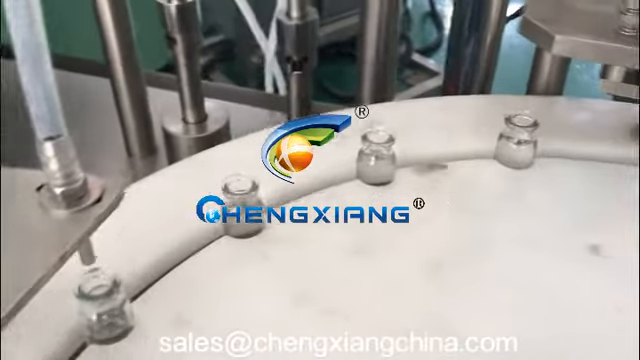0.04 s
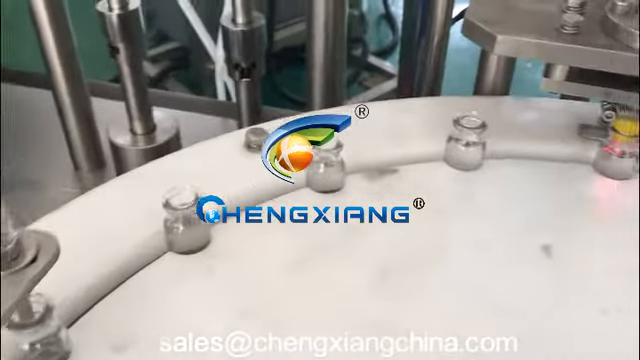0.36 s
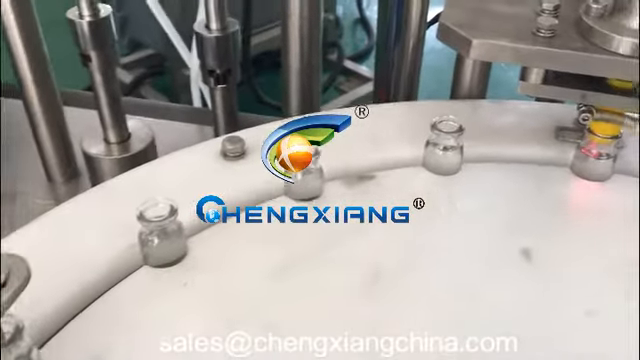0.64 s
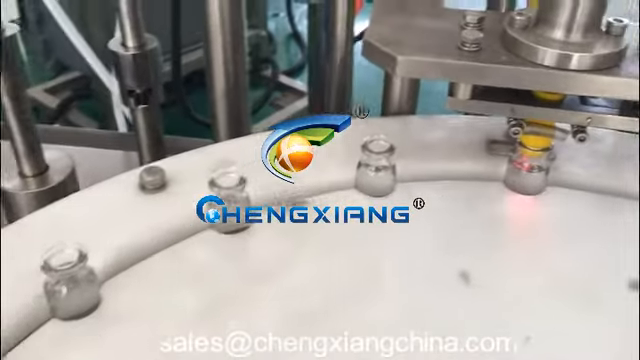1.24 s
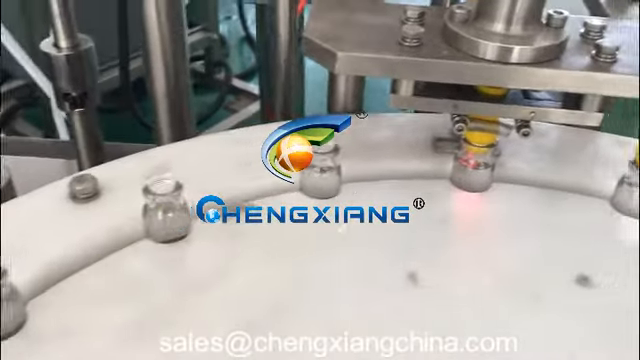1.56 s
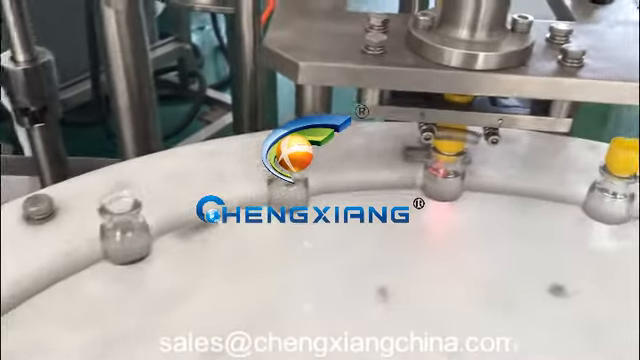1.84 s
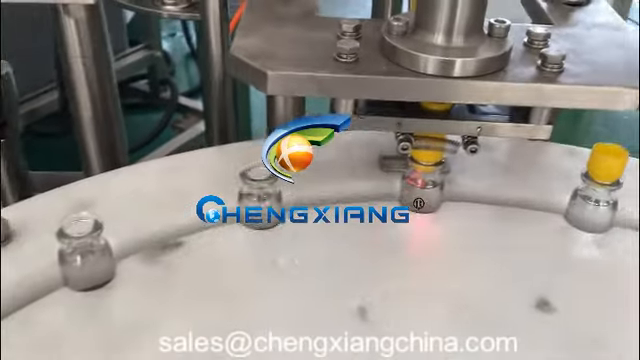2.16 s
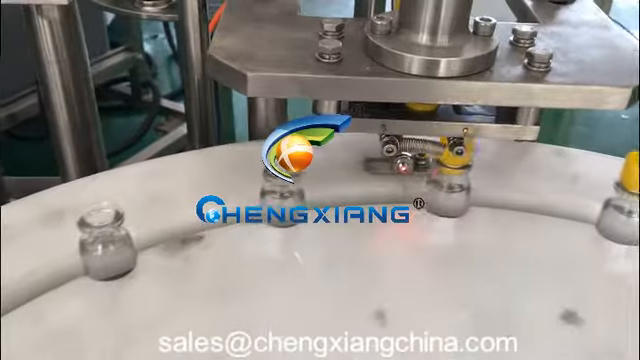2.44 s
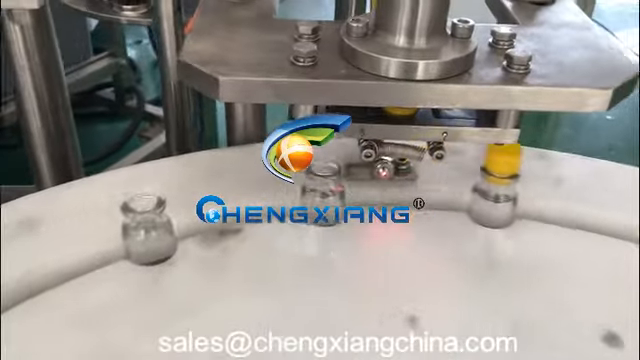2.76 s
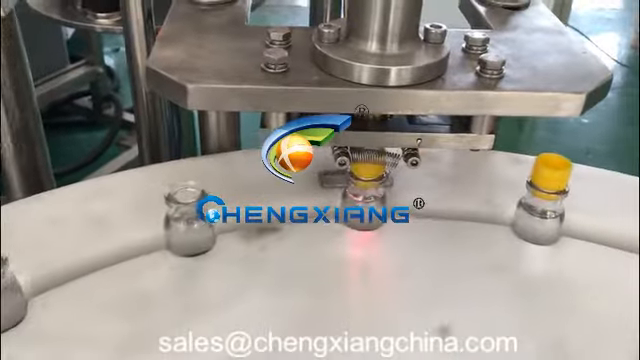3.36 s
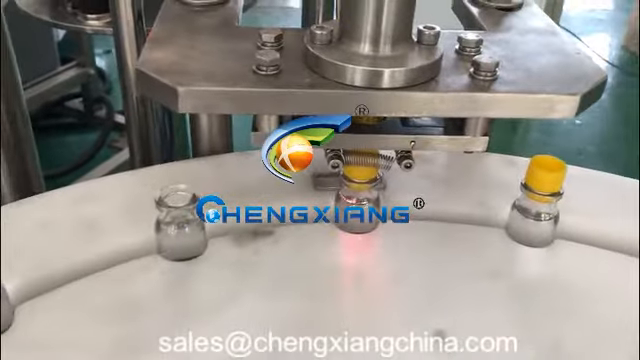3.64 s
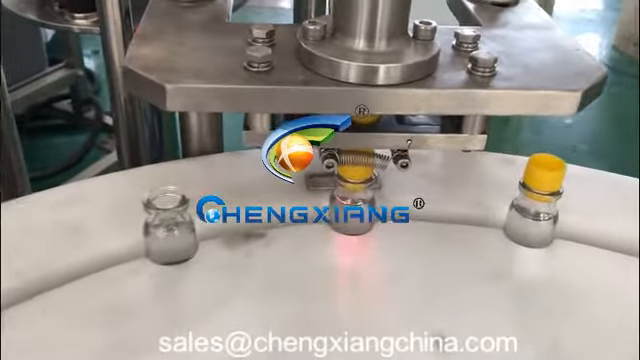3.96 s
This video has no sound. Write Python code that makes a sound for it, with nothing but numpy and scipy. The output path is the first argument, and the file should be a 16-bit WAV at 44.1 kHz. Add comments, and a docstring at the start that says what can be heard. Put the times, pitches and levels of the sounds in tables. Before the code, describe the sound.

A steady air jet hisses close by, broken by two short pauses with metal clunks.

```python
"""An air jet hisses close by on a bottle capping machine in a factory hall, while the filling head rubs.
Almost at once a valve thumps and cuts the air, a latch ticks and a metal slide rattles against its stop.
At 0.6 s the air surges back, and a cylinder lands with a clunk that rings the frame. The jet hisses on
until a second cut at 3.3 s; the slide clacks, then sings thinly. At 3.7 s come another surge and clunk.
The frame hums whenever parts travel, and distant machines rumble throughout."""
import sys
import numpy as np
from scipy import signal
from scipy.fft import rfft, irfft
from scipy.io import wavfile
from scipy.ndimage import uniform_filter1d

SR = 44100
rng = np.random.default_rng(int(sys.argv[2]) if len(sys.argv) > 2 else 0)


def wav_out(sig):
    """Save sig, one row per channel (or a flat mono array), as 16-bit PCM at SR to the path in sys.argv[1]."""
    wavfile.write(sys.argv[1], SR, np.round(np.clip(np.atleast_2d(sig).T, -1, 1) * 32767).astype(np.int16))


N = 176400  # 4 seconds
USUAL_NOZZLE_HZ, NOZZLE_WIDTH_HZ = 4500, 250

# How each of the three blasts of air changes over time.
# Each row: time in seconds, body level in dB, treble level in dB, pitch of the nozzle in Hz.
FIRST_BLAST = [(0.0, -14, -16.5, 4480), (0.084, -16, -16.5, 4470), (0.162, -13.5, -17, 4630),
               (0.192, -20.5, -27, 4260)]
LONG_BLAST = [(0.58, -40, -39, 4190), (0.6, -19, -28, 4130), (0.63, -11.5, -18.5, 4200),
              (0.68, -17.5, -20, 4400), (0.77, -15, -16.5, 4520), (0.89, -16, -17.5, 4470),
              (2.45, -15.5, -17.5, 4400), (2.68, -16, -17, 4340), (2.8, -16, -17.5, 4270),
              (3.25, -16, -18, 4200), (3.27, -17, -22.5, 4210), (3.29, -20, -29.5, 4100)]
LAST_BLAST = [(3.674, -68, -46, 4230), (3.688, -22, -34.5, 4020), (3.72, -14, -19.5, 4200),
              (3.752, -14.5, -22.5, 4100), (3.784, -20, -20, 4270), (3.824, -14.5, -16, 4350),
              (3.886, -15, -16, 4230), (3.995, -16, -18, 4170)]
def air_jet():
    """Three blasts of air leave the nozzle; the last two surge and squeal as they build up."""
    hiss = blast(FIRST_BLAST, fresh=False) + blast(LONG_BLAST) + blast(LAST_BLAST)
    return steel_reflections(nozzle_dip(hiss)) + squeals()


# The tone of the settled jet. Each row: frequency in Hz, level in dB.
JET_TONE = [(240, -102), (400, -30.5), (490, -58), (620, -33), (718, -40), (863, -31.5), (961, -31),
            (1480, -24), (1890, -27.5), (2200, -27.5), (2420, -18), (3090, -19.5), (3780, -4.5), (4250, -4),
            (4690, -2.5), (5140, -16), (5650, -9), (6470, -11.5), (6990, -16.5), (7550, -19.5), (8150, -10),
            (9300, -4.5), (10600, -14.5), (12500, -11.5), (14300, -10.5), (15800, -16.5)]
# The extra strength of a fresh blast. Each row: frequency in Hz, boost in dB.
SURGE_TONE = [(500, 12), (2000, 1), (2700, 8), (3400, 2), (4400, 5), (5300, 4.5), (6500, 5.5), (7600, 4),
              (9000, 3), (15000, 2.5)]
def blast(curve, fresh=True):
    """Swirling air hisses and the nozzle resonates; a fresh blast starts strong, then settles."""
    times, body_db, treble_db, pitches = np.transpose(curve)
    jet_db, usual_body_db, usual_treble_db = -16, -16.5, -17
    treble_from_hz, crossover_hz = 6250, 815
    open_db_per_s, shut_db_per_s, settle_s = 1200, 700, 0.29

    def gain_db(hz, t):
        treble_share = (1 + np.tanh((hz - treble_from_hz) / crossover_hz)) / 2
        body = (1 - treble_share) * np.interp(t, times, body_db - usual_body_db)
        treble = treble_share * np.interp(t, times, treble_db - usual_treble_db)
        opening = open_db_per_s * np.maximum(times[0] - t, 0)
        shutting = shut_db_per_s * np.maximum(t - times[-1], 0)
        age_s = np.maximum(t - times[0], 0)
        surge = fresh * read(SURGE_TONE, hz) * np.exp(-(age_s / settle_s) ** 2)
        # The body flutters very slightly, and random patches of the hiss swell and fade by about 1 dB.
        flutter = 0.07 * (1 - treble_share) * unit(uniform_filter1d(rng.standard_normal(len(t)), 12))
        patches = smooth_random(hz, t, frames=30, bands=4)
        nozzle_hz = np.interp(t, times, pitches)
        resonance = 5 * bell(hz, nozzle_hz, NOZZLE_WIDTH_HZ)
        # The whole tone slides part of the way with the nozzle's pitch.
        drift = read(JET_TONE, hz * (USUAL_NOZZLE_HZ / nozzle_hz) ** .35) - read(JET_TONE, hz)
        return body + treble - opening - shutting + surge + drift + resonance + flutter + patches
    return amp(jet_db) * shaped(noise(JET_TONE), gain_db)


def nozzle_dip(hiss):
    """Cuts a sharp dip above the nozzle's pitch; a small peak beside it fades when that pitch drops."""
    times, _, _, pitches = np.transpose(FIRST_BLAST + LONG_BLAST + LAST_BLAST)

    def gain_db(hz, t):
        nearness = np.clip(1 + (np.interp(t, times, pitches) - USUAL_NOZZLE_HZ) / NOZZLE_WIDTH_HZ, 0, 1)
        return 5 * nearness * bell(hz, 4865, width_hz=55) - 9 * bell(hz, 5010, width_hz=85)
    return shaped(hiss, gain_db, size=2048)


def steel_reflections(hiss, depth_db=1.8):
    """Echoes off nearby steel add narrow peaks and dips, which wander as if the listener were moving."""
    ripple_db = lambda hz, t: depth_db * smooth_random(hz, t, frames=70, bands=2, mode="wrap")
    return shaped(hiss, ripple_db, size=1024)


# The squeals of the jet. Each row: loudest moment in seconds, level in dB.
SQUEALS = [(0.697, -22), (3.792, -25)]
def squeals(width_s=.008):
    """The jet gives a brief, thin squeal as it builds up."""
    t = np.arange(N) / SR
    level = sum(amp(db) * np.exp(-((t - peak_s) / width_s) ** 2 / 2) for peak_s, db in SQUEALS)
    return level * band(12400, width_hz=380)


# The thumps of the valve. Each row: start in seconds, level in dB.
THUMPS = [(0.149, -26), (0.574, -19), (2.763, -37.5), (3.243, -32), (3.673, -24)]
# The tone of a thump. Each row: frequency in Hz, level in dB, seconds to fade by 60 dB.
THUMP_TONE = [(20, -40, 0.1), (45, -3, 0.15), (72.6, 6, .17), (162, -19, 0.086), (335, -10.5, 0.11),
              (705, -18, 0.11), (1150, -11, 0.078), (1800, -26.5, 0.073), (5000, -35, .04)]
def valve():
    """The valve moves with a short, deep thump."""
    return place((start, amp(db) * burst(THUMP_TONE, rise_s=0.00043)) for start, db in THUMPS)


# The landings of the cylinder. Each row: start in seconds, level in dB.
CLUNKS = [(0.653, 4.5), (3.747, 2.5)]
# The frame's notes. Each row: pitch in Hz, level in dB, then fade, delay and rise times in seconds.
FRAME_NOTES = [(176.5, -26, 0.6, 0.0036, 0.031), (329, -14.5, 0.078, .009, 0.0022),
               (337, -35, 0.58, 0.0046, .006), (379, -29.5, 0.46, .01, 0.0034),
               (410, -31, 0.45, .014, 0.004), (444, -20.5, 0.1, 0.0077, 0.0043),
               (668, -16, 0.03, 0.0078, 0.0016), (959, -22, 0.16, 0.0062, 0.002),
               (1084, -8.5, 0.02, 0.00089, 0.0014), (1360, -8, 0.0079, 0.004, 0.00053),
               (1764, -7, 0.024, 0.00054, 0.0014)]
# The dense ringing around them. Each row: frequency in Hz, level in dB, fade time in seconds.
FRAME_RINGING = [(152, -11, 0.52), (340, -2, 0.43), (456, 7, 0.28), (513, -2, 0.18), (700, -7, 0.27),
                 (790, -4, 0.11), (990, -4, 0.25), (1760, 0, 0.04), (2100, -35, 0.025)]
def cylinder():
    """The cylinder lands with a clunk that rings the frame; the lowest note swells last."""
    clunks = []
    for start, db in CLUNKS:
        ringing = amp(-27) * burst(FRAME_RINGING, rise_s=0.00084)
        clunks.append((start, amp(db) * (ring(FRAME_NOTES) + ringing)))
    return place(clunks)


# The hits of the slide. Each row: start in seconds, then click, ring and knock levels in dB.
CLACKS = [(0.2148, -16, -9.5, -24), (0.2178, -12, -9, -7), (0.2281, -17.5, -16, 0),
          (3.3110, -12.5, -3, -11.5)]
# The notes of the slide and of the machine's bed.
# Each row: pitch in Hz, level in dB, then fade, delay and rise times in seconds.
SLIDE_NOTES = [(225, -17, 0.06, 0, 0.002), (304, -10, 0.055, 0, 0.0016), (960, -33, 0.32, 0, 0.002),
               (1868, -38, 0.35, 0, 0.001), (2368, -37, .3, 0, 0.001), (2560, -1, 0.032, 0, 0.0018),
               (2546, -40, 0.6, 0, .001), (2593, -27, 0.2, 0, 0.001), (2980, -23, .06, 0, .001),
               (5600, -9, 0.02, 0.001, 0.0009)]
BED_NOTES = [(176.3, -26.5, 0.39, 0.056, 0.0036), (234, -33, 0.31, 0.022, .002),
             (309, -34.5, 0.29, 0.0085, 0.004), (405, -15.5, 0.022, 0.00059, 0.00051),
             (458, -17, 0.095, 0.013, 0.0011), (538, -16, 0.03, 0.016, 0.00052),
             (622, -9.5, 0.032, 0, 0.0022), (960, -34, 0.22, 0, .001),
             (1093, -16.5, 0.044, 0.0064, 0.00067), (1786, -20, 0.047, 0, 0.0013)]
# The jangle of loose parts. Each row: frequency in Hz, level in dB, fade time in seconds.
JANGLE_TONE = [(200, -23, 0.22), (1490, -25, 0.24), (2620, 13, 0.18), (3800, -6, 0.2), (4870, -19, 0.21),
               (5500, 11, 0.19), (8800, 10, 0.12), (15000, 1, 0.12)]
def slide():
    """The slide hits its stop and rings, loose parts jangle with it, and the stop knocks the bed."""
    clacks = []
    for start, click_db, ring_db, knock_db in CLACKS:
        ringing = ring(SLIDE_NOTES) + amp(-16) * burst(JANGLE_TONE, rise_s=0.0019)
        click = amp(click_db) * contact_click(rise_s=0.00055)
        knock = amp(knock_db) * ring(BED_NOTES)
        clacks.append((start, click + amp(ring_db) * ringing + knock))
    return place(clacks)


# The ticks of the latch. Each row: start in seconds, level in dB.
TICKS = [(0.1975, -9), (0.2112, -7), (3.2925, -13), (3.3072, -19)]
# The latch's notes. Each row: pitch in Hz, level in dB, then fade, delay and rise times in seconds.
LATCH_NOTES = [(4900, -6, .008, 0, .0003), (5520, -1, .014, 0, .0003), (6100, -4, .01, 0, .0003)]
def latch():
    """The latch ticks as the air drops: a click and a tiny, high ping."""
    ping = ring(LATCH_NOTES)
    return place((start, amp(db) * (ping + amp(-5) * contact_click(rise_s=0.00012)))
                 for start, db in TICKS)


# The tone of a click. Each row: frequency in Hz, level in dB, fade time in seconds.
CLICK_TONE = [(200, -2.5, 0.057), (1000, 0.5, 0.03), (1470, -3.5, 0.098), (3430, 0.5, 0.11),
              (6240, 2.5, 0.037), (8050, -3.5, 0.061), (15000, -4.5, 0.031)]
def contact_click(rise_s):
    """Two metal parts meet with a short, bright burst of noise."""
    return burst(CLICK_TONE, rise_s)


# The times when parts travel. Each row: start in seconds, end in seconds, level in dB.
TRAVEL = [(0.067, 0.607, -42), (0.668, 0.88, -45.5), (2.915, 3.25, -55.5), (3.32, 3.664, -44.5),
          (3.786, 3.997, -42.5)]
# The resonances of the humming frame. Each row: pitch in Hz, width in Hz, level in dB.
HUM_BANDS = [(176, 5.8, -6), (292, 65, -6.5), (422, 120, -9.5), (975, 60, -8.5), (132, 22, -5.5)]
def frame_hum():
    """Moving parts make the frame hum softly."""
    level = sum(amp(db) * during(start, end, fade_s=0.13) for start, end, db in TRAVEL)
    return level * unit(sum(amp(db) * band(hz, width) for hz, width, db in HUM_BANDS))


# The tone of the rubbing. Each row: frequency in Hz, level in dB.
RUB_TONE = [(500, -6), (1200, -4), (3800, -1), (7000, -5), (14000, -50)]
def head_rub():
    """The filling head rubs on its guides as it rises."""
    return amp(-42.5) * during(0, 0.5, fade_s=0.044) * noise(RUB_TONE)


def slide_song(pitch_hz=2550):
    """On its way back the slide sings thinly on its main note."""
    tone = np.sin(2 * np.pi * pitch_hz * np.arange(N) / SR)
    return amp(-48.5) * during(3.52, 3.65, fade_s=0.044) * tone


# The echo of the hall. Each row: frequency in Hz, level in dB, fade time in seconds.
HALL_TONE = [(100, -10, 1.6), (395, 7.5, 1.3), (1000, 5.5, 0.76), (1790, 8, 0.74), (2740, 14.5, 0.4),
             (4350, -16, 1.3), (6330, -2, 1.2), (9100, -10.5, 2), (15000, -2, 0.66)]
def hall(sound):
    """The hall answers a sound with a smooth, fading echo."""
    tail = burst(HALL_TONE, rise_s=0.0029)
    return signal.fftconvolve(sound, tail / np.linalg.norm(tail))[:N]


# The rumble and the wash of the factory. Each row: frequency in Hz, level in dB.
RUMBLE_TONE = [(12, -50), (20, -39), (53, -1.5), (87, -3.5), (144, -6), (177, 2.5), (203, -2.5), (327, 3.5),
               (460, -39), (520, -27), (680, -46), (1140, -120)]
WASH_TONE = [(240, -16.5), (400, -15), (745, -12), (935, -10.5), (1610, -15.5), (2300, -8.5), (3100, -9),
             (5600, -12), (12000, -30.5), (15000, -62)]
def factory():
    """Distant machines make a steady low rumble and a soft wash of noise."""
    return amp(-50) * noise(RUMBLE_TONE) + amp(-42) * noise(WASH_TONE)


def amp(db):
    """Turns decibels into a gain."""
    return 10 ** (np.asarray(db) / 20)


def unit(x):
    """Scales a signal to an average (rms) level of 1."""
    return x / np.sqrt(np.mean(x ** 2) + 1e-20)


def read(points, hz, column=1):
    """Reads a tone table at any frequency, blending between rows on a log-frequency scale."""
    table = np.array(points, float)
    return np.interp(np.log(hz + 1), np.log(table[:, 0] + 1), table[:, column])


def place(events):
    """Mixes (start in seconds, sound) pairs into one track."""
    track = np.zeros(N)
    for start, sound in events:
        part = track[round(start * SR):][:len(sound)]
        part += sound[:len(part)]
    return track


def during(start, end, fade_s):
    """A gain of 1 from start to end, with a fade on either side."""
    t = np.arange(N) / SR
    return np.clip(1 + np.minimum(t - start, end - t) / fade_s, 0, 1)


def bell(hz, centre_hz, width_hz):
    """A smooth bump of height 1 around one frequency."""
    return np.exp(-((hz - centre_hz) / width_hz) ** 2)


def smooth_random(hz, t, frames, bands, mode="reflect"):
    """Random values, smoothed over neighbouring time frames and frequency bands."""
    slow = uniform_filter1d(rng.standard_normal((len(hz), len(t))), frames, axis=1, mode=mode)
    return unit(uniform_filter1d(slow, bands, axis=0))


def noise(tone, size=N):
    """Steady noise that follows a tone table."""
    hz = np.fft.rfftfreq(size, 1 / SR)
    phases = np.exp(2j * np.pi * rng.random(len(hz)))
    return unit(irfft(amp(read(tone, hz)) * phases, size))


def band(hz, width_hz):
    """Steady noise in one resonance."""
    offset = (np.fft.rfftfreq(N, 1 / SR) - hz) / width_hz
    return unit(irfft(rfft(rng.standard_normal(N)) / (1 + offset ** 2), N))


def shaped(x, gain_db, size=256):
    """Turns a sound up or down by gain_db(frequency, time)."""
    frames = dict(nperseg=size, noverlap=size - size // 4)
    hz, t, spectrum = signal.stft(x, SR, **frames)
    return signal.istft(spectrum * amp(gain_db(hz[:, None], t)), SR, **frames)[1][:len(x)]


def burst(tone, rise_s):
    """Noise that starts quickly; each band drops 60 dB in its own fade time."""
    fading = shaped(noise(tone, SR), lambda hz, t: -60 * t / read(tone, hz, column=2))
    return fading * (1 - np.exp(-np.arange(SR) / SR / rise_s))


def ring(notes):
    """The notes of a struck part: each waits, swells, and drops 60 dB in its fade time."""
    out = np.zeros(SR)
    for hz, db, fade_s, delay_s, rise_s in notes:
        t = np.maximum(np.arange(SR) / SR - delay_s, 0)
        envelope = amp(db - 60 * t / fade_s) * (1 - np.exp(-t / rise_s))
        out += envelope * np.sin(2 * np.pi * hz * t)
    return out


def scene():
    """The machine is straight ahead; both ears hear almost the same sound."""
    machine = air_jet() + valve() + cylinder() + latch() + slide()
    machine += frame_hum() + head_rub() + slide_song()
    middle = machine + amp(-18.5) * hall(machine) + factory()
    side = amp(-48.5) * hall(machine)
    return np.array([middle + side, middle - side])


def record(dry, low_cut_hz=48, knee=.8, high_cut_hz=15780):
    """Cuts the deepest bass, gently squashes peaks above the knee, then cuts the highest treble."""
    x = signal.sosfilt(signal.butter(2, low_cut_hz, "high", fs=SR, output="sos"), dry)
    clean = np.clip(x, -knee, knee)
    limited = clean + (1 - knee) * np.tanh((x - clean) / (1 - knee))
    low_pass = signal.firwin(511, high_cut_hz, window=("kaiser", 9), fs=SR)
    return signal.oaconvolve(limited, low_pass[None], "same")


dry = scene()
out = record(dry)
wav_out(out)
```